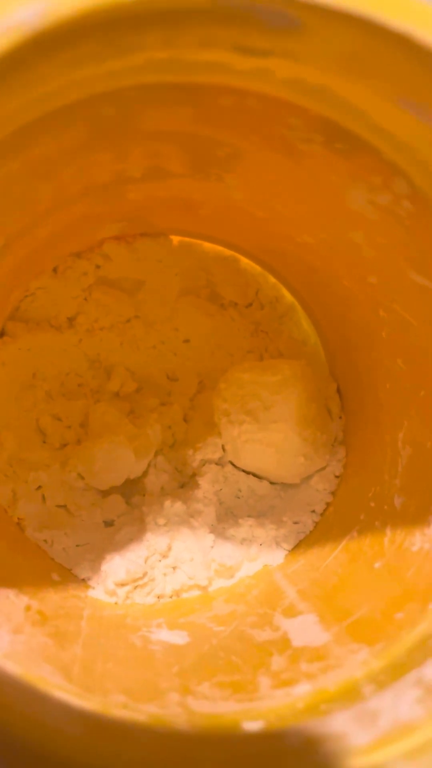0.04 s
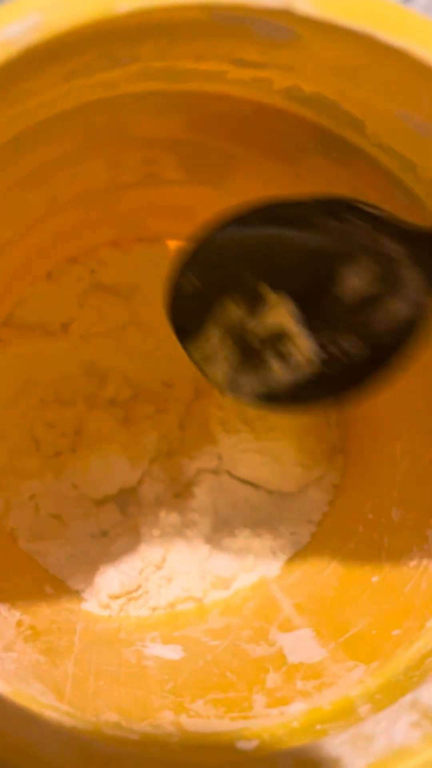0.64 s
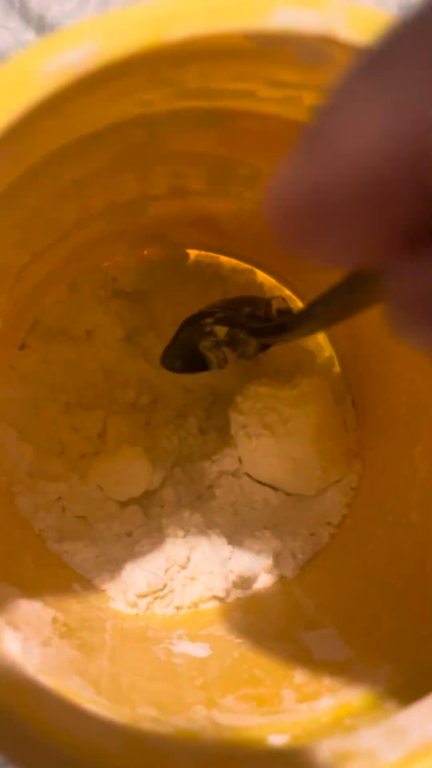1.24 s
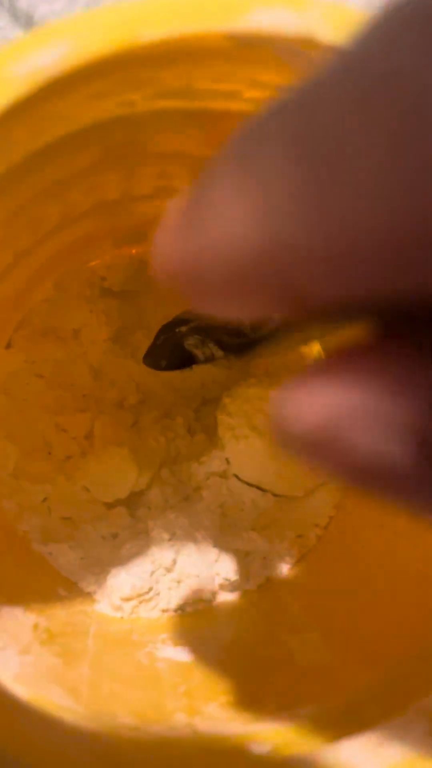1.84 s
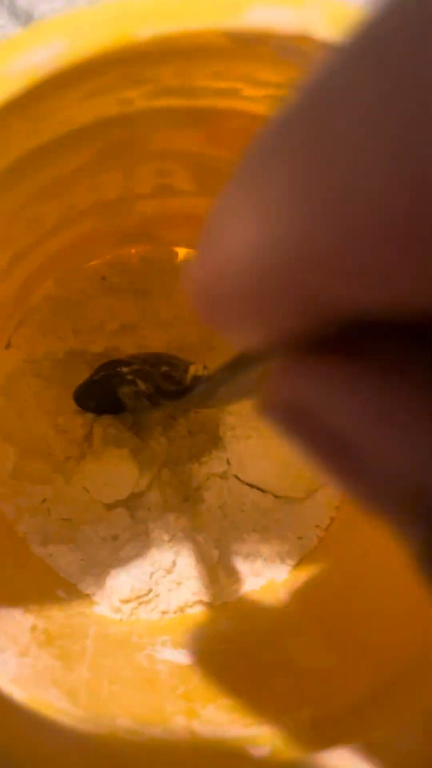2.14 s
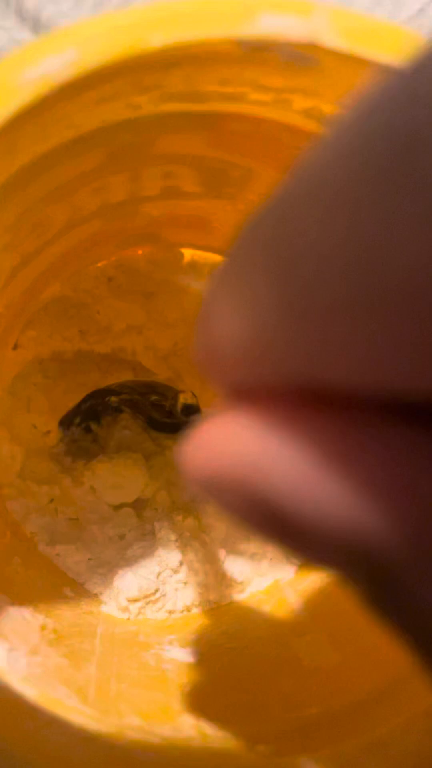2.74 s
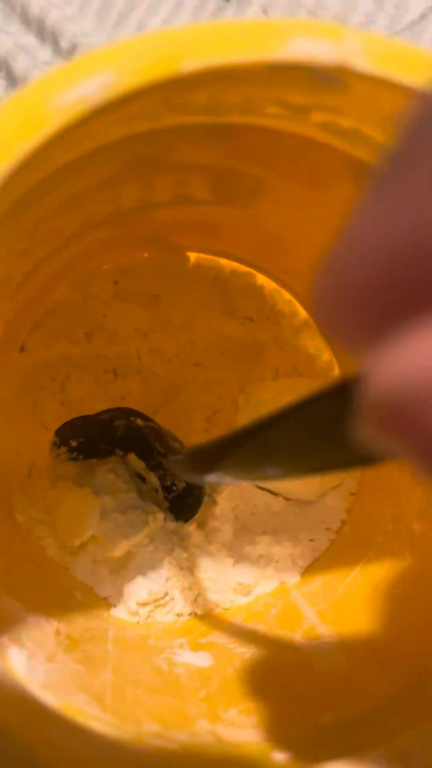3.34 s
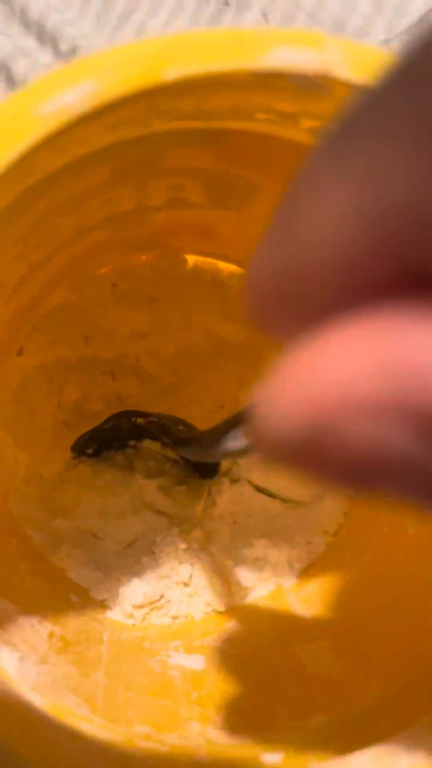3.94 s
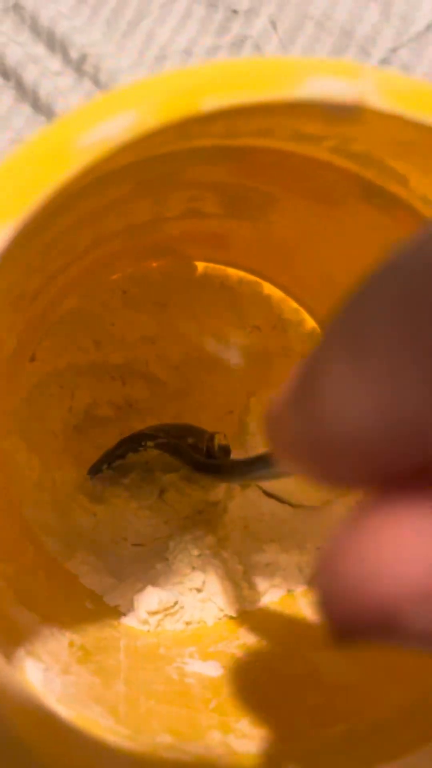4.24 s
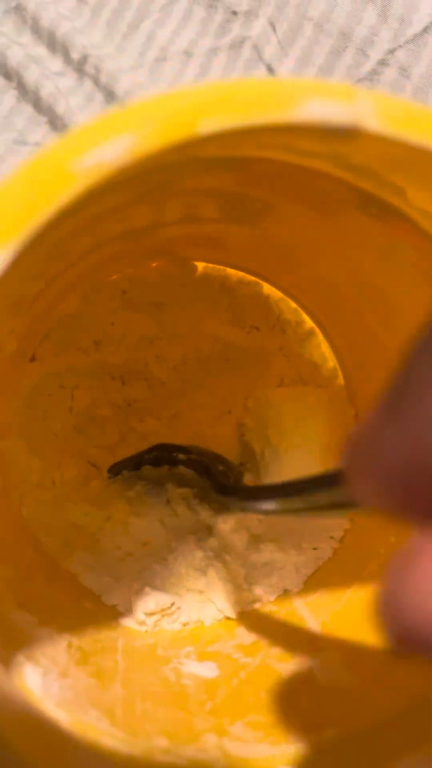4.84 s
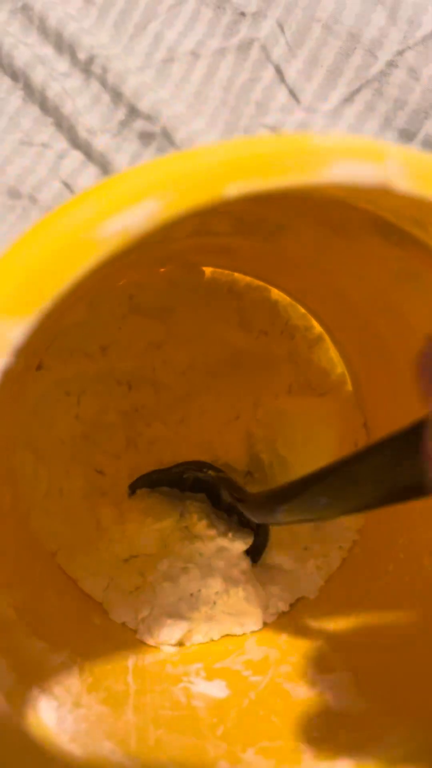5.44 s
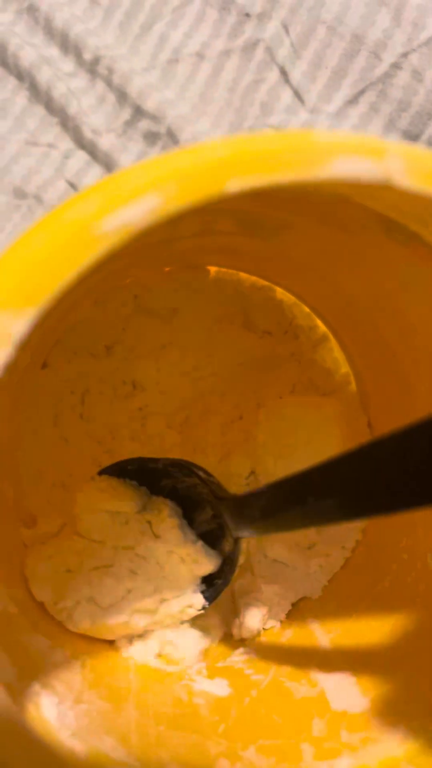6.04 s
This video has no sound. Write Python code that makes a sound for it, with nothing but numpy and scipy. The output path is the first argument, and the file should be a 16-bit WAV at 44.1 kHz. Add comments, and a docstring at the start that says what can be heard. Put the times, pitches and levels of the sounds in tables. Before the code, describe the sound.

In a quiet room, close to the microphone, a metal spoon knocks a few times in quick succession against a plastic tub, short and hollow. It then skims the crust of packed dry powder with a faint, hissy scrape, a slight metallic ring and some sharp clicks. The spoon digs deeper in uneven strokes, crunching softly, with small snaps of breaking crust and light taps on the tub.

```python
"""In a quiet room, a metal spoon knocks against a plastic tub, skims the crust of the packed powder
inside, then digs in and levers out a lump. Impacts excite the tub's damped modes, a hollow ring,
and rock it on its cloth. Stick-slip friction crushes grains, which crunch, hiss and set the spoon
ringing; the crust snaps by brittle fracture. A close pair of microphone ports hears it out of phase."""
import sys
import numpy as np
from scipy import signal
from scipy.fft import rfft, irfft, next_fast_len
from scipy.io import wavfile

SR = 44100
rng = np.random.default_rng(int(sys.argv[2]) if len(sys.argv) > 2 else 0)


def master_out(mix):
    """Clip the mix to full scale and print it as 16-bit PCM to the path in sys.argv[1]."""
    frames = np.transpose(np.atleast_2d(mix))
    ceiling = np.clip(frames, -1, 1)
    pcm = np.round(ceiling * 32767).astype(np.int16)
    wavfile.write(sys.argv[1], SR, pcm)


N = 273861

# impacts of the spoon on the tub: t/s, level/dB, pitch ratio set by where and how hard it leans
KNOCKS = [(0.4326, -20, 1.034), (0.4463, -25, 0.98), (0.4927, -23, 1.065), (0.512, -30.5, 1.1),
          (0.5262, -30.5, 1.02), (0.636, -47.5, 0.69), (0.9194, -48, 0.75), (0.9918, -46.5, 1.0),
          (1.7641, -45.5, 0.98), (2.415, -41.5, 0.93), (5.1741, -43, 1.03), (5.242, -43, 0.96)]
# snaps of crust and taps of the spoon's edge: t/s, bright crack level/dB, hollow tock level/dB
SNAPS = [(0.4944, -25.5, -42), (0.5485, -24.5, -29.5), (0.608, -37.5, -51), (0.919, -59, -36.5),
         (1.38, -21, -24.5), (1.7462, -40, -36), (1.7637, -32, -35.5), (1.792, -27.5, -30),
         (2.2472, -43, -37), (2.2752, -52, -35.5), (2.6811, -34, -46), (2.8003, -49, -40),
         (2.9137, -44, -40), (2.932, -42.5, -40), (3.244, -38, -61), (3.552, -45, -42), (4.019, -38, -32.5),
         (4.2903, -49, -32), (4.571, -37.5, -32.5), (4.9778, -31, -26), (5.1742, -46, -36),
         (5.218, -33, -30), (5.301, -26, -30.5), (5.4896, -44, -38), (5.6225, -44, -33.5),
         (5.68, -24.5, -30.5), (5.7367, -34, -43), (5.944, -52, -29)]
# normal modes of the tub: f/Hz, level/dB, T60/s
TUB_MODES = [(267, -11.5, 0.039), (349, -10, 0.06), (501.8, 2, 0.07), (567, -3.5, 0.036),
             (648, -12.5, 0.057), (851, -17.5, 0.031), (1110, -22.5, 0.04), (1765, -21.5, .03),
             (1944, -12.5, 0.02)]
# how firmly the spoon bears on the wall: t/s, level/dB of the tub's ring relative to the crunch
LEAN = [(0.54, 13), (0.7, -5.5), (1.45, -13), (2.15, -6), (2.33, -16), (2.5, 8), (2.7, -19.5), (3.2, -7.5),
        (4.3, -8), (4.6, 4), (4.9, -1), (5.25, 3), (5.55, -6), (6.21, -21)]


def from_db(db):
    """Amplitude ratio of a level in decibels."""
    return 10 ** (np.asarray(db) / 20)


def rms_one(x):
    """Normalisation to unit mean power."""
    return x / np.sqrt(np.mean(x ** 2) + 1e-20)


def at_time(points, s):
    """Linear interpolation of a curve in time."""
    return np.interp(s, *np.transpose(points))


def at_hz(points, hz):
    """Interpolation of a curve in logarithmic frequency."""
    f, value = np.transpose(points)
    return np.interp(np.log(hz + 1), np.log(f), value)


def coloured(x, *spectra, size=2048):
    """Minimum-phase filtering: the levels of spectra in series add."""
    hz = np.linspace(0, SR / 2, size // 2 + 1)
    gain = from_db(sum(at_hz(spectrum, hz) for spectrum in spectra))
    cepstrum = irfft(np.log(gain))
    cepstrum[1:size // 2] *= 2  # folding onto positive time makes the filter causal
    cepstrum[size // 2 + 1:] = 0
    response = irfft(np.exp(rfft(cepstrum)))
    return signal.oaconvolve(np.atleast_2d(x), response[None], axes=1)[:, :N]


def drift(per_s):
    """Continuous random fluctuation of unit power."""
    knots = rng.standard_normal(N // 10)
    return rms_one(np.interp(np.arange(N) / SR * per_s, np.arange(len(knots)), knots))


def blows(events):
    """Impulse train from rows of t/s, level/dB."""
    s, db = np.transpose(events)
    return np.bincount(np.round(s * SR).astype(int), from_db(db), N)


def dying(x, t60):
    """Exponential decay: each impulse falls by 60 dB in t60 seconds."""
    return signal.lfilter([1], [1, -from_db(-60 / (t60 * SR))], x + 1e-18)


def ringing(modes, rise_s, pitch=1):
    """Impulse response: damped modes swell as the body gives, then ring out."""
    t = np.arange(SR // 4) / SR
    sines = [(-1) ** k * from_db(db - 60 * t / t60) * np.sin(2 * np.pi * hz * pitch * t)
             for k, (hz, db, t60) in enumerate(modes)]
    return sum(sines) * (1 - np.exp(-t / rise_s))


def struck(modes, force, rise_s):
    """Forced vibration: the force is convolved with the body's impulse response."""
    return signal.oaconvolve(np.atleast_2d(force), ringing(modes, rise_s)[None], axes=1)[:, :N]


def with_scatter(direct, envelope, *spectra):
    """Scattering at the tub's walls divides the power into a direct and a diffuse part."""
    # diffuse sound, different at each port: f/Hz, level/dB relative to the direct sound
    scatter = [(100, -15), (500, -11), (800, 5.5), (1600, -22.5), (2200, -12), (2800, 11), (3700, 5),
               (4500, 3), (5100, -7), (7500, -44.5), (9500, 1), (11000, -9), (16000, -20)]
    direct_share = [(hz, -10 * np.log10(1 + from_db(db) ** 2)) for hz, db in scatter]
    diffuse = envelope * rng.standard_normal((2, N)) * from_db([[-1.3], [1.0]])
    return coloured(direct, direct_share, *spectra) + coloured(diffuse, scatter, direct_share, *spectra)


def room_tone():
    """Stationary background noise, strongest in the bass."""
    # room spectrum: f/Hz, level/dB
    room = [(20, -26), (55, -3.5), (130, -1.5), (210, -2.5), (350, -5.5), (600, -15), (1200, -17),
            (3000, -29.5), (6000, -28.5), (11000, -27), (16000, -33)]
    return rms_one(with_scatter(rng.standard_normal(N), 1, room))


def knocking(rise_s, smother_s):
    """Impact excitation: knocks and snaps ring the tub, and contact with the spoon damps it."""
    kick_db, kick_pitch = -17.5, 1.01  # a snap's coupling to the tub at full contact
    kicks = [(s, tock_db + kick_db + min(at_time(LEAN, s), 0), kick_pitch) for s, _, tock_db in SNAPS]
    out = np.zeros(N + SR)
    for s, db, pitch in KNOCKS + kicks:
        knock = from_db(db) * ringing(TUB_MODES, rise_s, pitch)
        damping = np.exp(-(np.arange(len(knock)) / SR / smother_s) ** 4)
        start = round(s * SR)
        out[start:start + len(knock)] += damping * knock
    return out[:N]


def burst(column, colour, knock_db, crack_t60, crumble_t60, crumble_db):
    """Two-stage decay: each snap, and each knock's tick, is a quick crack with a crumbling tail."""
    snaps = blows(np.array(SNAPS)[:, [0, column]])
    ticks = from_db(knock_db) * blows(np.array(KNOCKS)[:, :2])
    hits = snaps + ticks
    envelope = dying(hits, crack_t60) + from_db(crumble_db) * dying(hits, crumble_t60)
    return with_scatter(envelope * rng.choice([-1, 1], N), envelope, colour)


def snapping():
    """Brittle fracture and impact radiate broadband transients, a bright crack and a hollow tock."""
    # crack spectrum: f/Hz, level/dB
    bright = [(150, -6), (600, -4), (1100, -18.5), (2700, -13), (4300, -6), (5200, 3), (6200, 2.5),
              (8000, 7.5), (11000, -6.5), (16000, -10.5)]
    # tock spectrum: f/Hz, level/dB
    hollow = [(50, -34.5), (550, -2), (1150, -8.5), (1600, 4.5), (2000, -3), (2600, -6), (4000, -17.5),
              (8000, -27), (16000, -37)]
    cracks = burst(1, bright, knock_db=-14.5, crack_t60=0.0047, crumble_t60=0.11, crumble_db=-17)
    tocks = burst(2, hollow, knock_db=-6, crack_t60=0.0084, crumble_t60=0.064, crumble_db=-13)
    return cracks + tocks


def grains(per_s, spread_db):
    """Shot noise: tiny fractures at random moments, most weak and a few strong."""
    at, strength, side = rng.random((N // 2, 3))[:int(per_s * N / SR)].T
    sizes = from_db(spread_db * np.minimum(-np.log(1 - strength), 4))
    return rms_one(np.bincount((at * N).astype(int), sizes * np.sign(side - .5), N))


def crush(spectrum, slip, per_s, spread_db):
    """Amplitude modulation by stick and slip bunches a stream of grains."""
    return rms_one(with_scatter(slip * grains(per_s, spread_db), slip, spectrum))


def pressure_powers():
    """Sustained load gives crunch and dust a power between strokes, once the spoon touches."""
    # steady pressure: t/s, crunch level/dB, fine dust level/dB
    pressure = [(0.44, -73, -66), (1.05, -75, -74), (1.85, -79.5, -66), (2.85, -62.5, -72),
                (3.4, -77.5, -70.5), (4.17, -58.5, -63), (4.45, -71, -70), (4.7, -62, -66.5),
                (5.1, -66.5, -79), (6.21, -69, -68.5)]
    s, *levels = np.transpose(pressure)
    return [from_db(np.interp(np.arange(N) / SR, s, db, left=-120)) ** 2 for db in levels]


def stroke_powers(roundness=1.77):
    """Incoherent addition: strokes sum as lopsided bells of power; tub and steel follow the crunch."""
    # skimming, then digging: peak t/s, rise/s, fall/s, crunch level/dB, dust level/dB above the crunch
    strokes = [(0.514, 0.017, 0.035, -46, -5), (0.649, 0.025, 0.023, -57.5, 1),
               (0.79, 0.043, 0.13, -77.5, 16.5), (1.16, 0.076, 0.057, -69.5, 1.5),
               (1.3, 0.036, 0.077, -62.5, -9), (1.4, 0.031, 0.036, -55.5, 6),
               (1.508, 0.072, 0.04, -62, 4.5), (1.623, 0.034, 0.023, -59.5, 17.5),
               (1.793, 0.045, 0.037, -60.5, 11.5), (2.014, 0.021, 0.004, -64.5, 14.5),
               (2.11, 0.06, 0.039, -60.5, 6), (2.21, 0.091, 0.033, -58, 0.5), (2.287, 0.015, 0.015, -48, 6),
               (2.409, 0.051, 0.0061, -58.5, 5), (2.5, 0.02, 0.043, -55.5, 16), (2.7, 0.034, 0.026, -52, 5),
               (2.857, 0.06, 0.027, -56.5, 2.5), (3.07, 0.063, 0.054, -58.5, 2.5),
               (3.188, 0.051, 0.093, -54.5, 7.5), (3.5, 0.059, 0.11, -63.5, 4),
               (3.701, 0.13, 0.03, -54, -4), (3.82, 0.045, 0.05, -57.5, -3.5),
               (4.293, 0.033, 0.027, -55, -2.5), (4.572, 0.02, 0.065, -57, 2),
               (4.801, 0.015, 0.1, -57.5, 0.5), (4.983, 0.025, 0.022, -51, 5),
               (5.047, 0.0051, 0.016, -58.5, 4), (5.255, 0.12, 0.036, -54, -2.5),
               (5.331, 0.03, 0.13, -54, -1), (5.51, 0.049, 0.021, -51.5, 2),
               (5.62, 0.056, 0.041, -59.5, -5.5), (5.735, 0.069, 0.037, -53.5, 1),
               (5.951, 0.067, 0.084, -55, 0.5), (6.183, 0.11, 0.12, -62, -14)]
    # bare metal sliding on powder: t/s, level/dB of its ring relative to the crunch
    bare_metal = [(1.15, 2.5), (1.4, 15), (1.63, 16), (1.9, 1), (2.1, 0.5), (2.4, -31), (2.7, 3), (3.25, 1),
                  (3.55, -25), (5.5, -16), (5.74, 3)]
    t = np.arange(0, N, 20) / SR
    crunch = dust = 0
    for s, rise, fall, db, dust_db in strokes:
        bell = np.exp(-2 * np.abs((t - s) / np.where(t < s, rise, fall)) ** roundness)
        crunch = crunch + from_db(db) ** 2 * bell
        dust = dust + from_db(db + dust_db) ** 2 * bell
    tub = crunch * from_db(at_time(LEAN, t)) ** 2
    steel = crunch * from_db(at_time(bare_metal, t)) ** 2
    return [np.interp(np.arange(N) / SR, t, power) + 1e-18 for power in (tub, crunch, dust, steel)]


def digging():
    """Stick-slip friction: powder crunches and hisses under each push and shakes tub and spoon."""
    # spectrum of crushed grains: f/Hz, level/dB
    crunch_spectrum = [(30, -37), (150, -10.5), (350, -3), (800, -6), (1150, -2.5), (1570, 2), (2000, -3.5),
                       (2280, 2), (2600, -2), (3400, -2), (4500, -7.5), (5400, -5.5), (7000, -10),
                       (16000, -25.5)]
    # spectrum of fine dust: f/Hz, level/dB
    dust_spectrum = [(2000, -28), (4400, -12), (5200, -6.5), (6250, -2), (6900, -8), (8700, 2.5),
                     (9800, -1), (10700, 1.5), (12200, -8), (14500, -6.5), (15600, -8)]
    tub, crunch, dust, steel = stroke_powers()
    steady_crunch, steady_dust = pressure_powers()
    slip = from_db(1.66 * drift(260) + 1.02 * drift(60))
    grit = crush(crunch_spectrum, slip, per_s=2600, spread_db=2.5)
    crumbs = grains(per_s=70, spread_db=2.8)
    crumb_envelope = rms_one(np.sqrt(dying(crumbs ** 2, t60=0.0019)))
    crumbling = from_db(-10) * rms_one(with_scatter(crumbs, crumb_envelope, crunch_spectrum))
    wall_force = slip * grains(per_s=2500, spread_db=2.8)
    tub_ring = rms_one(struck(TUB_MODES, wall_force, rise_s=0.00058))
    hiss = from_db(-0.3) * crush(dust_spectrum, slip, per_s=16000, spread_db=3.5)
    spoon = from_db(-0.13) * spoon_ring(slip, buried_s=1.77)
    return (np.sqrt(crunch + steady_crunch) * (grit + crumbling)
            + np.sqrt(tub + from_db(-9.5) ** 2 * steady_crunch) * tub_ring
            + np.sqrt(dust + steady_dust) * hiss
            + np.sqrt(steel) * spoon)


def spoon_ring(slip, buried_s):
    """Resonance and damping: grains ring the spoon's bowl; once buried, it mostly rasps."""
    # modes of the free spoon: f/Hz, level/dB, T60/s
    modes = [(1850, -10.5, 0.038), (2290, -11.5, 0.033), (4900, -10, 0.029), (5560, -27, 0.023),
             (5800, -18, 0.042), (5930, -2, 0.029), (6210, -1.5, 0.041), (6310, 1, 0.014),
             (8110, 7, 0.0063), (10400, -9, 0.0091), (11180, -10, 0.0083)]
    # spectrum of the buried bowl: f/Hz, level/dB
    rasp_spectrum = [(3000, -20), (4500, -1.5), (5250, 6), (5700, 2), (6250, 10), (6900, -2.5),
                     (8000, -21.5), (9000, -29), (16000, -36)]
    free_share = np.interp(np.arange(N) / SR, [buried_s, buried_s + 0.45], [.7, .15])
    force = with_scatter(slip * grains(per_s=9000, spread_db=4.85), slip)
    ring = rms_one(struck(modes, force, rise_s=0.00044))
    rasp = crush(rasp_spectrum, slip, per_s=6600, spread_db=6.0)
    return np.sqrt(free_share) * ring + np.sqrt(1 - free_share) * rasp


def wall_echo(x, delay_s, wander, echo_db):
    """Comb filtering: the near wall's reflection interferes, its delay shifting as the spoon moves."""
    n = np.arange(N)
    emitted = n - delay_s * SR * (1 + wander * drift(5))
    echo = np.array([np.interp(emitted, n, channel) for channel in x])
    return (x + from_db(echo_db) * echo) / np.hypot(1, from_db(echo_db))


def rocking(rise_s, jolt_db):
    """Mass on a spring: the tub thuds on its cloth when a snap jolts it and when it settles."""
    # rocking modes: f/Hz, level/dB, T60/s
    modes = [(45.2, -10, 0.21), (63.5, -5, 0.31), (111.6, 0, 0.12), (197, -2.5, 0.16)]
    # the tub settling: t/s, level/dB
    settles = [(0.655, -51.5), (5.045, -59), (5.74, -55)]
    jolts = from_db(jolt_db) * blows(np.array(SNAPS)[:, :2])
    return struck(modes, jolts + blows(settles), rise_s)


def halting(halt_db):
    """Friction noise needs sliding: its gain dips whenever the spoon halts to change direction."""
    # halts: middle t/s, half-length/s
    halts = [(0.595, 0.0077), (1.573, 0.012), (2.238, 0.018), (2.933, 0.042), (3.995, 0.016),
             (4.922, 0.0099), (5.083, 0.03), (5.557, 0.013)]
    t = np.arange(0, N, 20) / SR
    halted = sum(np.exp(-((t - s) / half_s) ** 4) for s, half_s in halts)
    return np.interp(np.arange(N) / SR, t, from_db(halt_db * halted))


def rubbing(s, width_s):
    """Sliding friction: one soft swell of narrow-band noise as the spoon turns in its hole."""
    # rub spectrum: f/Hz, level/dB
    spectrum = [(300, -44), (700, -7), (880, 2), (1080, -2), (1350, -33), (3000, -49)]
    bell = np.exp(-((np.arange(N) / SR - s) / width_s) ** 2)
    return bell * rms_one(coloured(rng.standard_normal(N), spectrum))


def ports(x):
    """Phase difference: the two microphone ports hear the sound out of step, more so in the treble."""
    # lead of the left port: f/Hz, phase/rad
    port_phase = [(50, 0), (550, -.4), (1000, .1), (1950, 0), (3100, 1.3), (3700, .8), (4400, 1.2),
                  (4900, -.3), (7300, 3.0), (8100, 3.3), (10400, 6.2), (11600, 6.4), (13500, 9.2),
                  (16000, 10.5)]
    size = next_fast_len(N + SR // 10)
    lead = at_hz(port_phase, np.arange(size // 2 + 1) * SR / size)
    rotation = np.exp(.5j * lead * np.array([[1], [-1]]))
    return irfft(rfft(x, size) * rotation, size)[:, :N]


def scene():
    """Superposition of knocks, scraping and snaps over a faint room tone."""
    knocks = knocking(rise_s=0.0014, smother_s=0.035) * from_db([[-1.2], [1.0]])
    thuds = rocking(rise_s=0.0035, jolt_db=-33)
    scrape = halting(halt_db=-9.5) * digging()
    scrape = wall_echo(scrape, delay_s=0.001244, wander=0.09, echo_db=-9)
    snaps = snapping()
    rub = from_db(-65.5) * rubbing(s=2.61, width_s=0.062)
    room = from_db(-72) * room_tone()
    return ports(knocks + thuds + scrape + snaps + rub + room)


def record(dry):
    """Band limiting: a steep elliptic low-pass removes the highest treble."""
    cutoff_hz = 15780
    return signal.sosfilt(signal.ellip(10, .2, 80, cutoff_hz, fs=SR, output="sos"), dry)


dry = scene()
out = record(dry)
master_out(out)
```